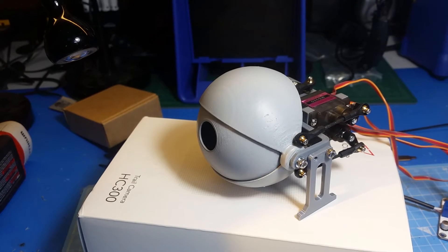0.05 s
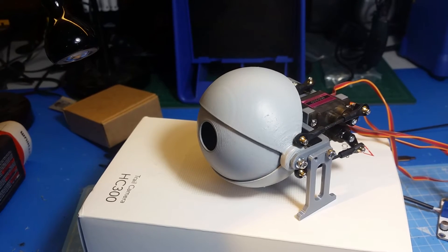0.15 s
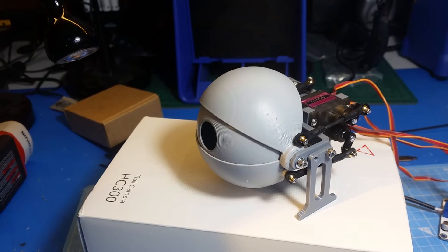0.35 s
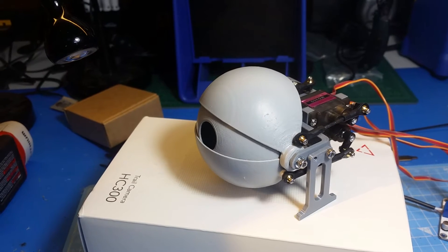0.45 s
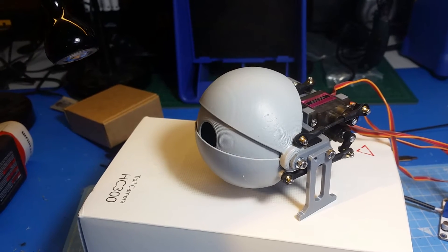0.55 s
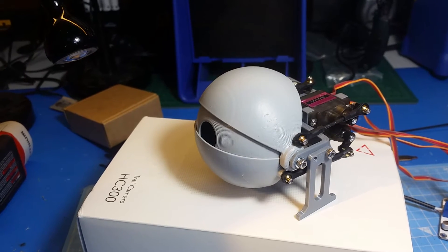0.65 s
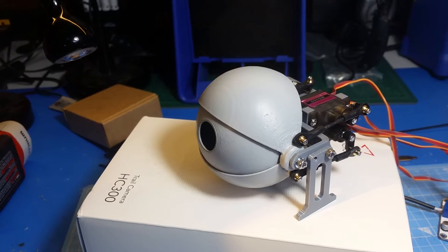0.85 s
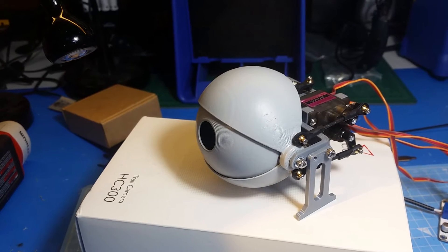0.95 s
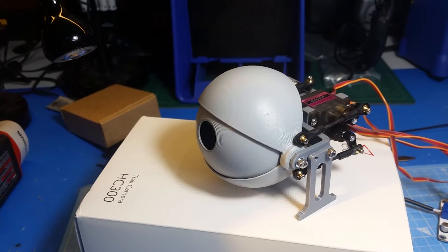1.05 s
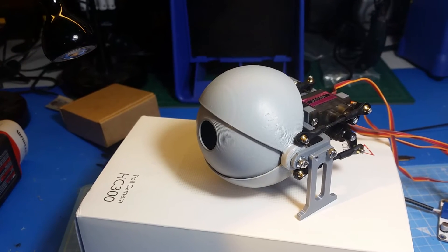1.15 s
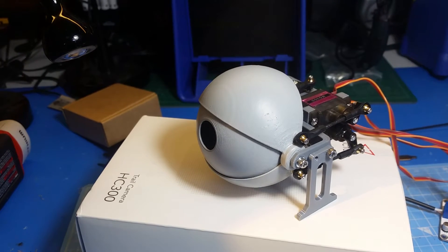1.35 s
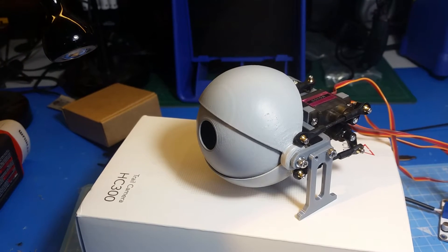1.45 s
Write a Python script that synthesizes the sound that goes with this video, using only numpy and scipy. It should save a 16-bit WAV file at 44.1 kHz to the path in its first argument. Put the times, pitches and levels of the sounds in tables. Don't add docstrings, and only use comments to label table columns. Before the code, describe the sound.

After a soft low knock, hobby servos whir sharply, drone lower and stop; another quick whir follows, winding down to a rough buzz. A cardboard box hums beneath, with faint room rumble and hiss, closely miked.

```python
import sys
import numpy as np
from scipy import signal
from scipy.fft import rfft, irfft, next_fast_len
from scipy.io import wavfile
from scipy.ndimage import uniform_filter1d, map_coordinates

SR = 44100
rng = np.random.default_rng(int(sys.argv[2]) if len(sys.argv) > 2 else 0)


def log_audio(samples):
    frames = np.atleast_2d(samples).T
    limited = np.clip(frames, -1, 1)
    pcm = np.round(limited * 32767).astype(np.int16)
    wavfile.write(sys.argv[1], SR, pcm)


def volts_from_db(level):
    exponent = np.asarray(level, float) / 20
    return 10 ** exponent


N = 66150

# (frequency [Hz], level [dB])
AIR_LEFT = [(30, 0.5), (95, -4.5), (160, -9), (320, -14.5), (600, -26), (2500, -34), (4500, -15.5),
            (6500, -46)]
AIR_RIGHT = [(30, -15), (95, -3), (160, -6.5), (320, -16), (600, -29), (2500, -37), (5000, -42.5),
             (8000, -51)]
PORT_HISS = [(6000, -59), (10000, -64.5), (12000, -45), (15500, -48.5)]
# (frequency [Hz], correlation [0-1])
AIR_COHERENCE = [(100, 1), (350, 0.76), (800, 0.033)]
# (frequency [Hz], width [Hz], level [dB])
FAN_LINES = [(96.2, 5.6, -66), (313.8, 14, -75)]
# (frequency [Hz], T60 [s])
ROOM_T60 = [(300, .8), (2000, 0.58), (4000, 1), (6000, 0.24), (9000, 0.3), (14000, 0.34)]
# (frequency [Hz], level [dB])
SHUDDER = [(25, -8.5), (60, -5), (95, -2), (140, -12), (300, -25.5)]
# (time [s], level [dB], frequency [Hz])
KNOCKS = [
    (0.1175, -45.5, 149.8),
    (.941, -55.5, 615),
    (1.034, -69.5, 390),
    (1.203, -49.5, 110.9),
]
# (time [s], level [dB], half length [s])
SCUFFS = [
    (.945, -52.5, 0.023),
    (1.036, -51.5, 0.016),
    (.285, -47, 0.018),
    (0.73, -52.5, 0.025),
]
# (frequency [Hz], width [Hz], level [dB])
BOX_MODES = [(88, 18, 5.5), (240, 58, 3.5), (327, 57, 4.5), (510.5, 75, 3.5), (719, 29, -2.5),
             (986, 150, 0), (1624, 131, 6), (2033, 74, 3.5)]
# (frequency [Hz], difference [dB])
BOX_PAN = [(500, 0), (1000, 5), (1700, 11)]
# (order [per turn], level [dB])
ROTOR_ORDERS = [(1, -3.5), (2, -14.5), (3, -9.5), (4, -18)]
# (hum at full speed [dB], power of speed [-])
IMBALANCE = [
    (-41, 3.8),
    (-36.5, 1.8),
    (-60, 2.2),
    (-48, 1.6),
    (-38, 1.94),
]
# (upper ring [dB], top ring [dB])
RING_TINT = [
    (1.5, 4.5),
    (1, 1),
    (-16, -7),
    (-3.5, 0.5),
    (-5, -2),
]
# (frequency [Hz], width [Hz], level [dB])
CASE_MODES = [(940, 180, -4.5), (1570, 120, -5), (1983, 125, -16), (4500, 1000, -6), (5723, 420, 3),
              (6395, 300, -1), (6740, 200, -6), (7514, 306, 6), (8800, 1300, -11.5), (10430, 310, -6),
              (11400, 240, -6.5), (12230, 800, 3), (13300, 1000, 3), (14740, 480, -1)]
# (frequency [Hz], level [dB])
LEFT_PORT = [(500, -20.5), (1700, -12), (2700, -15.5), (4300, -8.5), (6500, 0.5), (9000, -9), (10900, -16),
             (13500, -8)]
RIGHT_PORT = [(500, -29), (1700, -13), (2700, -26), (4300, -20), (7000, -26), (10700, -10), (12500, -10.5),
              (14500, -3)]
# (time [s], rotor speed [turns/s], gear rattle [dB])
MOVES = [
    [(.1752, 20, -65), (.2, 150, -52), (.228, 370, -38), (.244, 475, -39), (.259, 525, -33),
     (.27, 500, -40), (.278, 340, -40), (.292, 220, -42.5), (.31, 60, -63)],
    [(.316, 40, -53), (.322, 90, -41), (.35, 139, -37), (.385, 127, -38), (.43, 98, -40), (.474, 72, -46),
     (.486, 86, -40.5), (.522, 98, -36.5), (.54, 30, -67)],
    [(.544, 20, -55), (.554, 30, -43.5), (.578, 18, -79)],
    [(.6855, 22, -60), (.708, 150, -50), (.745, 320, -36.5), (.762, 370, -31.5), (.779, 510, -32.5),
     (.79, 330, -36.5), (.806, 150, -42), (.814, 120, -38), (.827, 60, -88)],
    [(.83, 40, -53), (.853, 190, -33), (.872, 170, -39.5), (.905, 150, -37.5), (.92, 105, -40),
     (.945, 112, -38), (.96, 108, -39.5), (.985, 80, -54), (1.004, 19, -67.5)],
]

FULL_SPEED_HZ = 500
TEETH = 9
DRIVE_HZ, STALL_HZ = 345, 60.23
UPPER_RING_HZ, TOP_RING_HZ = 7000, 9500


def unit(x):
    return x / np.sqrt(np.mean(x ** 2) + 1e-20)


def along(points, hz):
    f, v = np.transpose(points)
    return np.interp(np.log(hz + 1), np.log(f + 1), v)


def filtered(x, response):
    m = next_fast_len(N + SR // 2)
    spectrum = rfft(x, m) * response(np.fft.rfftfreq(m, 1 / SR))
    return irfft(spectrum, m)[..., :N]


def resonances(modes):
    def response(f):
        total = 0
        for k, (center, width, db) in enumerate(modes):
            damping = 1j * f * width
            total = total + (-1) ** k * volts_from_db(db) * damping / (center * center - f * f + damping)
        return total
    return response


def wobble(rate_hz):
    knots = rng.standard_normal(int(N * rate_hz / SR) + 4)
    return map_coordinates(knots, [np.arange(N) * rate_hz / SR])


def air():
    def mid_side(f):
        turn = np.arccos(np.clip(along(AIR_COHERENCE, f), -1, 1)) / 2
        return np.array([np.cos(turn), np.sin(turn)])

    def shape(f):
        rumble = volts_from_db(np.array([along(AIR_LEFT, f), along(AIR_RIGHT, f)]))
        return rumble * np.exp(-(f / 11000) ** 6) + volts_from_db(along(PORT_HISS, f))

    mid, side = filtered(rng.standard_normal((2, N)), mid_side)
    bed = unit(filtered(np.array([mid + side, mid - side]), shape))
    bed = bed * volts_from_db(-63.5 + 0.5 * wobble(5.5))
    fan = 0
    for center, width, db in FAN_LINES:
        noise = rng.standard_normal(N) + 0.56 * rng.standard_normal((2, N))
        fan = fan + volts_from_db(db) * unit(filtered(noise, resonances([(center, width, 0)])))
    return bed + fan


def room(x):
    wet_db, early_db, early_t60_s = -9.5, -7.5, 0.023
    hz, t, z = signal.stft(rng.standard_normal((2, SR // 2)), SR, nperseg=256)
    tail = signal.istft(z * volts_from_db(-60 * t / along(ROOM_T60, hz)[:, None]), SR, nperseg=256)[1]
    early = rng.standard_normal(tail.shape) * volts_from_db(-60 * np.arange(tail.shape[1]) / SR / early_t60_s)
    tail = volts_from_db(wet_db) * tail / np.linalg.norm(tail[0])
    early = volts_from_db(early_db) * early / np.linalg.norm(early[0])
    return signal.fftconvolve(x[None], tail + early, axes=1)[:, :N]


def shudder(rattle):
    linger_s, level_db = 0.07, -15.5
    linger = np.exp(-np.arange(SR // 2) / SR / linger_s)
    effort = signal.fftconvolve(rattle, linger / linger.sum())[:N]
    noise = rng.standard_normal(N) + 0.49 * rng.standard_normal((2, N))
    shake = unit(filtered(noise, lambda f: volts_from_db(along(SHUDDER, f)) * (f < 600)))
    return volts_from_db(level_db) * effort * shake


def knocks():
    t = np.arange(N) / SR
    pushes, scuff_gain = np.zeros(N), np.zeros(N)
    for s, db, hz in KNOCKS:
        u = (t - s) * 3.6 * hz
        pushes += volts_from_db(db) * (1 - u * u) * np.exp(-u * u / 2)
    for s, db, half_s in SCUFFS:
        scuff_gain += volts_from_db(db + 11) * np.exp(-((t - s) / half_s) ** 2)
    scuffs = scuff_gain * rng.standard_normal(N)
    return pushes, filtered(scuffs, lambda f: 1 / (1 + (f / 900) ** 4))


def controls():
    t, out = np.arange(N) / SR, np.zeros((5, N))
    for move, (hum_db, power), (upper_db, top_db) in zip(MOVES, IMBALANCE, RING_TINT):
        s, hz, rattle_db = np.transpose(move)
        on = (t >= s[0]) & (t < s[-1])
        speed = np.interp(t, s, hz)
        fast = speed / FULL_SPEED_HZ
        rattle = volts_from_db(np.interp(t, s, rattle_db))
        hum = volts_from_db(hum_db) * fast ** power
        upper = volts_from_db(upper_db) * on
        top = volts_from_db(top_db) * fast ** 0.15
        out += on * np.array([speed, rattle, hum, upper, top])
    return out


def rotor(speed, rattle, hum):
    phase = 2 * np.pi * np.cumsum(speed * (1 + 0.015 * wobble(80))) / SR
    orders = 0
    for order, db in ROTOR_ORDERS:
        orders = orders + volts_from_db(db + 3.1 * wobble(70)) * np.sin(round(order) * phase)
    mesh = volts_from_db(-29 + 5.7 * wobble(40)) * np.sin(TEETH * phase)
    mesh += volts_from_db(-33 + 4.3 * wobble(48.86)) * np.sin(2 * TEETH * phase)
    hum = uniform_filter1d(hum, size=90)
    rattle = uniform_filter1d(rattle, size=90)
    return np.sqrt(2) * (hum * orders + rattle * mesh * (speed < 200))


def gears(speed, gain, upper, top):
    jitter, scatter_db, noise_share, turn_depth = 0.12, 3, 0.71, 0.25
    click_hz, bed_db = 3500, -15
    stall = np.exp(-(speed / STALL_HZ) ** 2)
    rate = TEETH * speed * (1 - stall) + DRIVE_HZ * stall
    count = np.cumsum(rate * (1 + jitter * wobble(900))) / SR
    size = volts_from_db(scatter_db * rng.standard_normal(N // 4))[count.astype(int)]
    clicks = np.diff(np.floor(count), prepend=0) * size * np.sqrt(SR / np.maximum(rate, 1))
    clicks = filtered(clicks, lambda f: 1 / (1 + (click_hz / (f + 1)) ** 4))
    puffs = size * np.exp(-2.5 * (count % 1)) * rng.standard_normal(N)
    contacts = np.sqrt(1 - noise_share) * unit(clicks) + np.sqrt(noise_share) * unit(puffs)
    turn = 1 + turn_depth * np.cos(2 * np.pi * np.cumsum(speed) / SR)
    drive = unit(turn * contacts) * gain * volts_from_db(0.62 * wobble(60))

    case = resonances(CASE_MODES)

    def ring_bands(f):
        above_upper = 1 / (1 + (UPPER_RING_HZ / (f + 1)) ** 12)
        above_top = 1 / (1 + (TOP_RING_HZ / (f + 1)) ** 12)
        bands = np.array([1 - above_upper, above_upper - above_top, above_top])
        return (case(f) + volts_from_db(bed_db)) * bands

    rings = filtered(drive * np.array([np.ones(N), upper, top]), ring_bands)
    return drive, rings.sum(0)


def servos():
    left_lag_s, apart_rad, rumble_db = -0.000028, 0.69, -7
    speed, rattle, hum, upper, top = controls()
    drive, case = gears(speed, rattle, upper, top)
    other = gears(speed, rattle, upper, top)[1]
    pair = np.array([case, np.cos(apart_rad) * case + np.sin(apart_rad) * other])

    def lag(f):
        return np.exp(-1j * np.pi * f * left_lag_s * np.array([[1], [-1]]))

    def ports(f):
        return volts_from_db(np.array([along(LEFT_PORT, f), along(RIGHT_PORT, f)]) + 14)

    def pan(f):
        return volts_from_db(along(BOX_PAN, f) * np.array([[0.5], [-0.5]]))

    airborne = filtered(filtered(pair, lag) + room(case), ports)
    push, scuff = knocks()
    box = resonances(BOX_MODES)
    board = rotor(speed, rattle, hum) + volts_from_db(rumble_db) * drive + scuff
    solid = filtered(board, lambda f: box(f) + 0.089 * (f < 2500)) + push
    boxborne = filtered(solid + volts_from_db(-2.5) * room(solid), pan)
    return airborne + boxborne + shudder(rattle)


def scene():
    return air() + servos()


def low_pass(x):
    return signal.sosfilt(signal.butter(12, 16280, fs=SR, output="sos"), x)


def record(dry):
    def band(hz):
        top_hz = 15750
        return hz / (hz + 15) / (1 + (hz / top_hz) ** 150) * (hz < top_hz + 130)

    return low_pass(filtered(dry, band))


dry = scene()
out = record(dry)
log_audio(out)
```